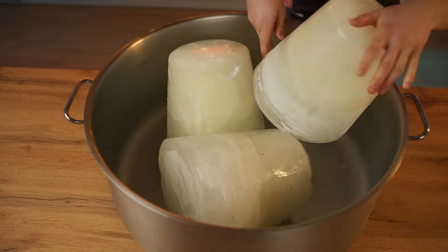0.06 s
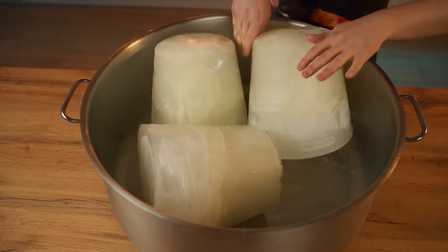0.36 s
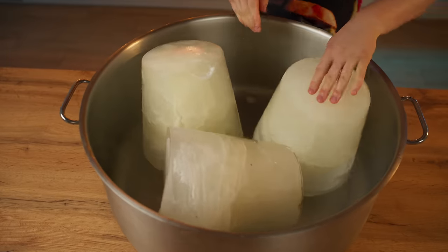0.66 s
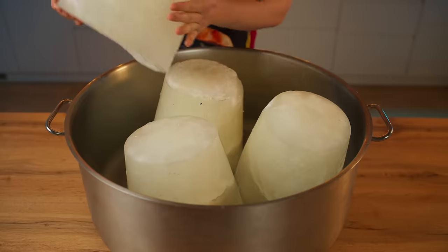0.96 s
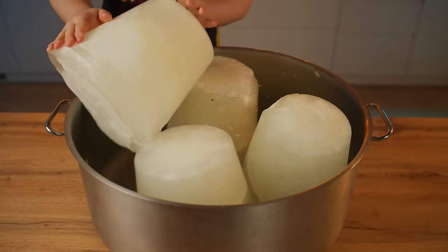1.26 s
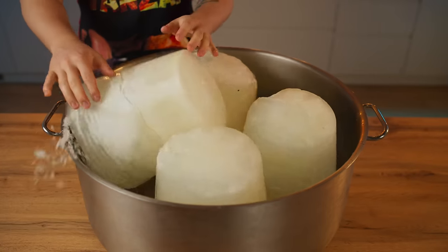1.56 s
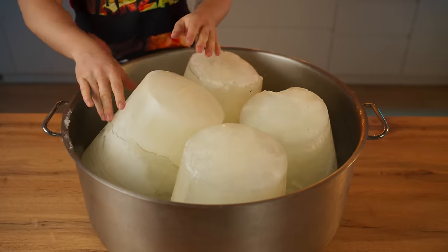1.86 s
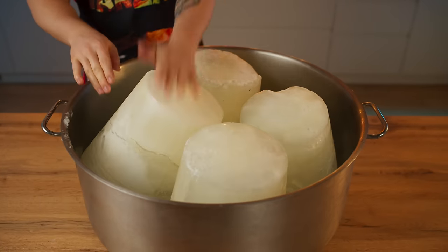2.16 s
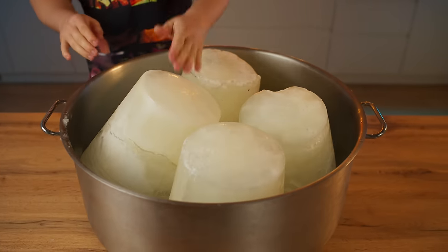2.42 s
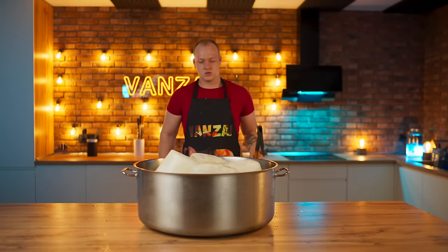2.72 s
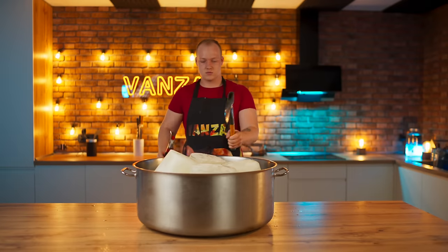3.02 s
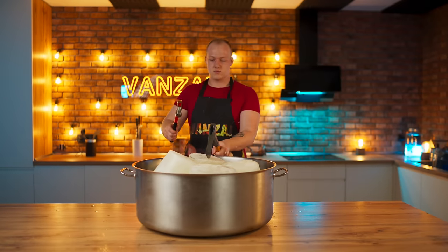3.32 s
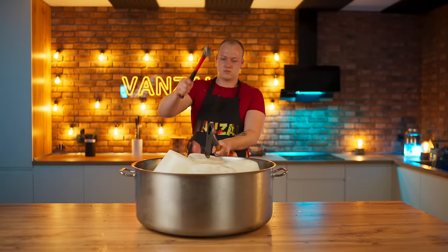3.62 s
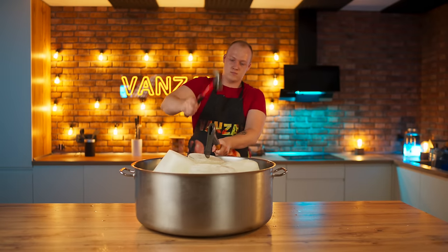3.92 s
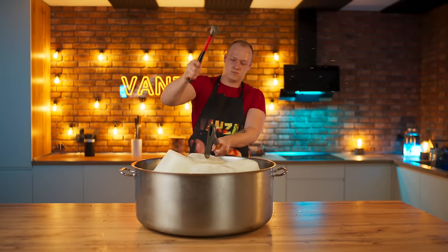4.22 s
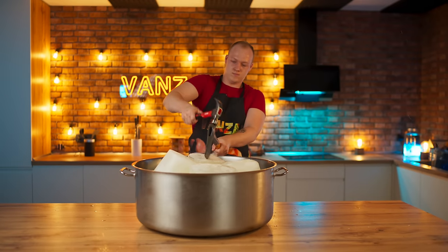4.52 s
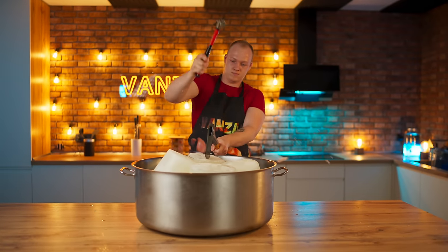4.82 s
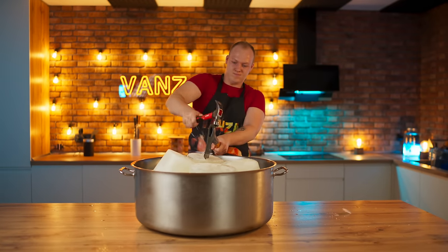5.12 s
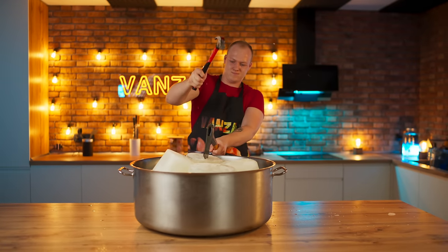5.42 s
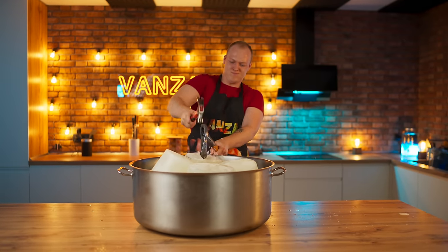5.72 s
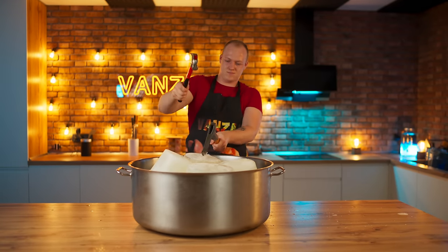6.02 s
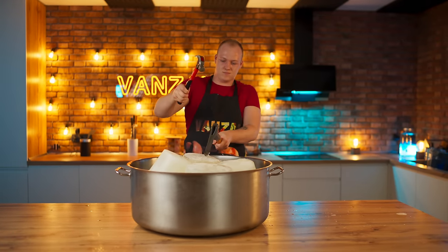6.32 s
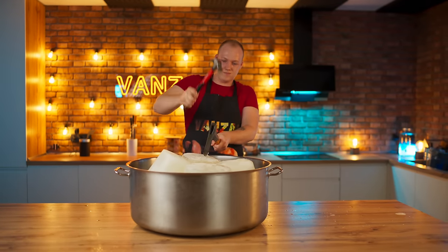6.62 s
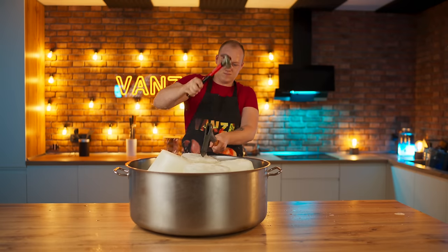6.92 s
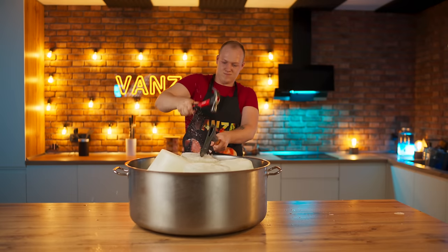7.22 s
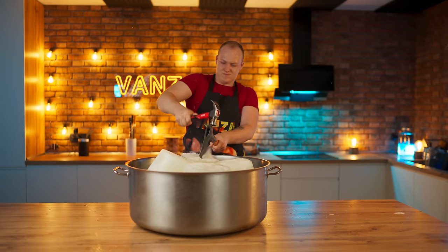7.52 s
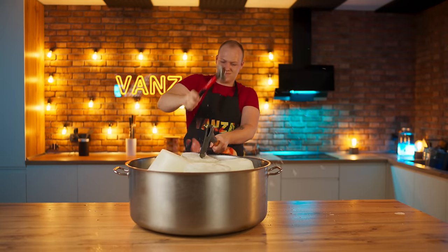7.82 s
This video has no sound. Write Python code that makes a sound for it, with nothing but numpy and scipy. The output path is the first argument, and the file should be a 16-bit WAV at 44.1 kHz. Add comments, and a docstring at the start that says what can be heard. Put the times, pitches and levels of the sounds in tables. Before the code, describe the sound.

From the start, big ice blocks land in a steel stockpot with dull thuds, hollow knocks and crackling frost, and the pot's wall and rim ring. The blocks grind down the metal at about 1.1 and 1.5 seconds and settle with a last knock at 2.1. The ringing cuts off short at 0.9 and 2.7 seconds. At 3.2 a light tap seats a steel blade in the ice. A hatchet then hammers the blade at 4.0, 4.5, 5.1 and 5.6 seconds, louder than the loading: each blow is a bright metallic clink with an ice crack and a low boom from the pot. A shard pings the pot at 4.8. After a faint rub and a soft tap near 6.2, four quicker blows fall at 6.7, 7.1, 7.5 and 7.9, increasingly splintery. Tiny chips tick between blows. The tiled kitchen adds short reverberation over a very faint rumble.

```python
"""A tiled kitchen, with a steel stockpot on the counter. Big ice blocks are set down in the pot:
they thud, grind and knock, its wall and rim ring, and frost crackles. Then a hatchet taps and hammers
a steel blade into the ice: the steel rings, the ice cracks, the pot booms and chips fly.
The room reverberates over a faint rumble. Three passages each run through a fast limiter,
and the ringing stops short at the end of each."""
import sys
import numpy as np
from scipy import signal
from scipy.fft import rfft, irfft
from scipy.io import wavfile
from scipy.ndimage import uniform_filter1d, minimum_filter1d

SR = 44100
rng = np.random.default_rng(int(sys.argv[2]) if len(sys.argv) > 2 else 0)


def to_wav(sig):
    """Store sig (one row per channel, or 1-D mono) as 16-bit WAV at the path in sys.argv[1].

    Samples outside -1..1 are clipped; the rate is SR.
    """
    pcm = np.clip(np.atleast_2d(sig), -1, 1) * 32767
    pcm = np.round(pcm).astype(np.int16)
    wavfile.write(sys.argv[1], SR, pcm.T)  # frames by channels


N = 351036
SIZE = 65536  # samples in one event
T, HZ = np.arange(SIZE) / SR, np.arange(SIZE // 2 + 1) * SR / SIZE
TICK_S = 0.0013  # the first instant of a hard contact

# hatchet blows: (time [s], thud [dB], ring [dB], hardness [dB], clank centre [Hz], crack decay [s])
BLOWS = [(3.9613, -24, -28.5, -5, 6440, .003), (4.5158, -25.5, -22, -10, 6600, 0.0064),
         (5.0674, -22.5, -17.5, -13, 6900, 0.031), (5.6008, -30, -26, -14, 7550, 0.0033),
         (6.6889, -34, -25, -12, 6690, 0.0025), (7.1116, -28, -22, -8.5, 8000, 0.019),
         (7.5098, -29, -21.5, -7.5, 7000, 0.021), (7.8706, -25.5, -22, -11, 7550, 0.0061)]
# passages: (start [s], end [s], limiter ceiling [dB])
PASSAGES = [(0, .892, -18), (.892, 2.728, -18), (2.728, 8, -7.7)]
# modes of pot wall, singing rim and counter: (frequency [Hz], level [dB], t60 [s])
WALL_MODES = [(1310, 2, .4), (1660, 1.5, 0.23), (1865, -6.5, 0.17), (1960, -0.5, 0.16), (2207, -5, .35),
              (2384, -2, .4), (2495, -3.5, 0.35), (2430, -6, 0.13), (2650, 0, 0.14), (2780, 0, 0.25),
              (2966, -9, .35), (3320, -1, .22), (3590, 0, .16), (4100, -7.5, 0.12)]
RIM_MODES = [(468, -5, 2.1), (506, 0, 2.3), (544, -12, 2.1), (996, -7, 1.9), (1044, -8, 1.7),
             (1168, -12, .7), (1610, -10, 1.1)]
COUNTER_MODES = [(41, -8.5, .3), (59, -6, 0.7)]
# tone of each kind of contact: (frequency [Hz], level [dB])
THUD_EQ = [(25, -48), (55, 4), (95, -12.5), (140, 2.5), (195, -1), (250, -0.5), (360, 2), (480, -6.5),
           (640, -2.5), (900, -28), (2500, -63)]  # the push through pot and counter
CRACK_EQ = [(200, -3.5), (700, 6.5), (1000, 5), (1350, 9), (1900, -1.5), (2600, 5), (3600, 5.5),
            (4600, 7.5), (5800, 5), (8300, -14.5), (10000, -19.5)]
GRIND_EQ = [(300, -24), (1200, 0), (2500, 2), (3100, 0.5), (3900, 1), (4800, -11), (7000, -13),
            (14000, -45.5)]
CRUNCH_EQ = [(2000, -39.5), (4000, 13), (5600, 9.5), (7500, 5), (10000, 8.5), (14000, 6), (16000, -2)]
SPLINTER_EQ = [(1500, -1.5), (4000, 1), (7000, 2.5), (10500, -0.5), (12700, 2.5), (13800, -13.5),
               (16000, -20.5)]


def block_contacts():
    """Yield (time, (thud, block, wall, crunch) dB, knock Hz, wall centre Hz, decay s, slides)."""
    # blocks hit the floor or slide down the wall: (time [s], level [dB], brightness [dB], decay [s])
    landings = [(0.002, -29.5, 0, 0.0089), (0.2975, -25.5, -2.5, 0.0038), (0.521, -35, 0, 0.019),
                (0.9715, -44.5, 2, 0.0073), (1.667, -33, 1, 0.021), (2.144, -38, 5.5, 0.0068)]
    scrapes = [(0.351, -27.5, 0, 0.013), (1.083, -31.5, 0, 0.045), (1.402, -41.5, 1.5, 0.017),
               (1.443, -25, 0, 0.04), (1.525, -32, 0.5, 0.04), (1.725, -40, 3, 0.0077)]
    # block knocks on block: (time [s], level [dB], pitch [Hz])
    bumps = [(0.0768, -31.5, 780), (0.156, -37, 376), (0.373, -27.5, 850), (0.477, -38.5, 990),
             (0.6506, -36.5, 650), (0.6977, -39, 406), (1.184, -39.5, 252), (1.2656, -31.5, 460)]
    landing_db, scrape_db, bump_db = (5.5, -.5, 0, -12), (-2.5, -7.5, -2, -15.5), (-0.5, 0, -6, -27.5)
    edge_tilt = np.array((-1, -0.4, 0.32, 1.5))  # a bright hit on an edge trades thud for crunch
    for table, mix_db, slides in ((landings, landing_db, False), (scrapes, scrape_db, True)):
        for s, db, bright_db, length in table:
            levels = db + np.array(mix_db) + bright_db * edge_tilt
            yield s, levels, 656, 2176 * 2 ** (0.66 * bright_db), length, slides
    for s, db, hz in bumps:
        yield s, db + np.array(bump_db), hz, 1500, 0.0053, False


def ice_in_pot():
    """Each contact shakes base, block, wall and rim as ice crumbles; knocks also jolt the counter."""
    # pot base, loaded with ice: (frequency [Hz], level [dB], t60 [s])
    base_modes = [(70, -5.5, 0.13), (89.8, -5, 0.55), (138, 1, 0.24), (185.7, 2, 0.078), (241.2, 0.5, 0.28),
                  (288, 6.5, 0.038), (334.6, -2, 0.29), (413, 0.5, 0.035)]
    # body of an ice block: (frequency [Hz], level [dB])
    block_eq = [(100, -16.5), (380, 8), (650, 4), (900, 4), (1400, 5), (2500, -26), (6000, -65)]
    tails = [kitchen(build_s=.008) for _ in range(5)]
    base = modes(base_modes) * focus(hz=205, q=0.3)
    wall, rim, counter = map(modes, (WALL_MODES, RIM_MODES, COUNTER_MODES))
    block, grind, crunch, crack = map(colour, (block_eq, GRIND_EQ, CRUNCH_EQ, CRACK_EQ))
    for k, (s, levels, knock_hz, wall_hz, length, slides) in enumerate(block_contacts()):
        thud_db, block_db, wall_db, crunch_db = levels
        tail = tails[k % len(tails)]
        force = crumble(length, spread_db=-0.5) if slides else hit(length, crush_db=15, spread_db=1.5)
        # the deep pot holds on to the lows; the crunch comes almost dry
        boomy, near = force + amp(-1) * tail, force + amp(-2.5) * tail
        crumbs = crumble(length, spread_db=-2) + amp(-7.5) * tail
        body = play(boomy * base, thud_db - .8) + play(near * block, block_db - .8)
        hollow = play((1 + amp(-4) * tail) * focus(knock_hz, q=11), block_db - 3)
        ring = play(near * wall * focus(wall_hz, q=2.1), wall_db - 7.5) + play(rim, block_db - 15.5)
        scrape = play(near * grind * focus(wall_hz, q=2), wall_db + 1)
        yield s, body + hollow + ring + scrape + play(crumbs * crunch, crunch_db + 4.5)
        if not slides:
            tick = hit(TICK_S, crush_db=8.5, spread_db=4)
            yield s, play(counter, wall_db - 8) + play(tick * crack, crunch_db - 2.5)


def hatchet_blows():
    """Steel rings on steel and the ice cracks; the push thuds through pot and counter."""
    # blade and hatchet head, struck hard: (frequency [Hz], level [dB], t60 [s])
    main_modes = [(3830, -5, .035), (4030, -4, .05), (4107, 0, .1), (4195, -1, .08), (4340, -6, .07)]
    upper_modes = [(5052, 0, .105), (5250, -2, .05)]
    clank_modes = [(5700, -14.5, 0.0062), (6360, 0, 0.011), (6790, 2.5, 0.0087), (7520, 2.5, 0.013),
                   (8485, -2.5, 0.012)]
    # the full pot, shaken as a whole: (frequency [Hz], level [dB], t60 [s])
    hum_modes = [(252, 5.5, 0.58), (320, -0.5, 1), (376, -1.5, 1.0)]
    main, upper, high = map(modes, (main_modes, upper_modes, clank_modes))
    hum, counter = modes(hum_modes), modes(COUNTER_MODES)
    crack, splinter, thud = colour(CRACK_EQ), colour(SPLINTER_EQ), late_thud()
    tails = [kitchen(build_s=0.0019) for _ in BLOWS]
    for tail, (s, thud_db, ring_db, hard_db, clank_hz, length) in zip(tails, BLOWS):
        # as the block breaks up, its crack rises in pitch and it splinters more
        elapsed = s - BLOWS[0][0]
        crack_hz = 2480 + 140 * elapsed
        splinter_db = -26 + 3.5 * elapsed + 0.69 * hard_db
        crack_db = -17 - 0.17 * hard_db  # on a softer hit the blade sinks in and splits more ice
        force = hit(length, crush_db=20.5, spread_db=-1.5)
        ice = play((force + amp(-4.5) * tail) * crack * focus(crack_hz, q=0.85), crack_db)
        ice += play((force + amp(-4) * tail) * splinter, splinter_db)
        # the head chatters on the blade, so no two blows ring alike
        chatter = hit(0.0059, crush_db=10.5, spread_db=3) + amp(-0.5) * tail
        steel = play(chatter * main, ring_db + 5.5)
        steel += play(chatter * upper, ring_db + min(hard_db, -8) + 8.5)
        clank = play(chatter * high * focus(clank_hz, q=3.3), ring_db + hard_db + 8.5)
        clank += play(chatter * focus(hz=5270, q=9.5), ring_db + hard_db + 6)
        push = hit(0.026, crush_db=6, spread_db=7.5) + tail
        pot = play(push * thud, thud_db + 5) + play(hum, thud_db - 9) + play(counter, db=-45.5)
        tick = play(hit(TICK_S, crush_db=16.5, spread_db=-6) * splinter, db=-19)
        yield s, tick + ice + steel + clank + pot


def seating_taps():
    """Light taps seat the blade: it rings loosely and nicks the ice over a soft thud."""
    # taps: (time [s], thud [dB], thud centre [Hz], crack [dB], ring [dB])
    taps = [(3.1769, -32.5, 106, -41, -45.5), (6.209, -39, 413, -55.5, -63)]
    # the loose blade: (frequency [Hz], level [dB], t60 [s])
    blade_modes = [(2850, -9, 0.14), (3680, -4, .04), (3830, 0, 0.07), (4100, 1, 0.05), (5340, -5, 0.05),
                   (5615, 1, 0.08), (5760, -3, .04), (9350, 1, 0.012)]
    for s, thud_db, thud_hz, crack_db, ring_db in taps:
        tail = kitchen(build_s=0.0019)
        tap = hit(0.0073, crush_db=8.5, spread_db=-2) + amp(2.5) * tail
        pot = play(tap * late_thud() * focus(thud_hz, q=0.41), thud_db)
        counter = play(modes(COUNTER_MODES), crack_db + 3.5)
        ice = play(tap * colour(CRACK_EQ) * focus(hz=1400, q=0.2), crack_db + 2)
        ice += play(tap * colour(SPLINTER_EQ), crack_db - 2.5)
        yield s, pot + counter + ice + play((1 + tail) * modes(blade_modes), ring_db + 8)


def flying_shards():
    """A shard strikes the pot and rings its wall and rim."""
    # impacts: (time [s], level [dB], ring centre [Hz])
    shards = [(4.761, -38, 2543), (4.9975, -50.5, 1440)]
    for s, db, hz in shards:
        strike = hit(.012, crush_db=9.5, spread_db=2.5) + amp(1) * kitchen(build_s=.008)
        wall = play(strike * modes(WALL_MODES) * focus(hz, q=6), db)
        rim = play(modes(RIM_MODES) * focus(hz, q=3), db - 18.5)
        grit = play(strike * colour(GRIND_EQ) * focus(hz, q=0.76), db + 3.5)
        yield s, wall + rim + grit + play(strike * colour(CRUNCH_EQ), db - 14)


def ice_clicks(tail):
    """Small ice chips land with bright clicks: two about half a second after each blow, and a few louder ones
    at set times."""
    # louder clicks at set times: (time [s], level [dB])
    snaps = [(2.364, -60.5), (5.0244, -56.5), (5.58, -48)]
    chips = [(s + rng.normal(0.5, 0.099), rng.normal(-64, 2.5)) for s, *_ in BLOWS for _ in range(2)]
    tone = colour(CRUNCH_EQ) * focus(hz=10000, q=.7)
    for s, db in [*snaps, *chips]:
        click = hit(0.0041, crush_db=18, spread_db=6) + amp(-4) * tail
        yield s, play(click * tone, db - 0.5)


def rubbing(tail):
    """Hand and blade rub a swell of tiny grains off the ice."""
    # strokes: (time [s], length [s], level [dB])
    strokes = [(2.61, 0.084, -70.5), (3.515, 0.15, -68), (5.879, 0.18, -51.5), (6.986, 0.087, -57.5),
               (7.774, 0.12, -45)]
    # their rasp: (frequency [Hz], level [dB])
    rub_eq = [(300, -4.5), (1300, -15.5), (2600, -5), (4000, -5), (6000, -15.5), (10000, -11), (16000, -18)]
    for s, length, db in strokes:
        swell = np.sin(np.pi * np.minimum(T / length, 1)) ** .5
        yield s, play((1 + tail) * rfft(grains(spread_db=5) * swell) * colour(rub_eq), db)


def frost(tail, snaps_per_s=200, fade_db_per_s=120):
    """Brittle snaps, each a millisecond of fractures, flare at every block contact and die away."""
    click = irfft(colour(CRUNCH_EQ) * (1 + amp(-8) * tail))
    onsets = rng.random(N) < snaps_per_s / SR
    sizes = amp(5.5 * np.minimum(rng.exponential(size=N), 3.5))
    snaps = signal.lfilter([1], [1, -np.exp(-1000 / SR)], onsets * sizes) * rng.standard_normal(N)
    level = np.zeros(N)
    for s, (_, _, wall_db, _), *_ in block_contacts():
        add(level, s, amp(wall_db - 18.5 - fade_db_per_s * T))
    crackle = signal.fftconvolve(snaps / snaps.std() * level, click / np.linalg.norm(click))[:N]
    for start, _, _ in PASSAGES:  # the crackle carries on through every passage
        yield start, crackle[int(start * SR):]


def kitchen(build_s):
    """Spectrum of a diffuse tail of unit energy; it builds up, and its treble dies first."""
    # reverb of the tiled room: (frequency [Hz], t60 [s])
    decays = [(60, 0.62), (160, 0.71), (400, 0.58), (1100, 0.56), (3000, 0.48), (7500, 0.43), (15000, 0.32)]
    noise, tail = rfft(rng.standard_normal(SIZE)), 0
    for hz, t60 in decays:
        band = along([(f, f == hz) for f, _ in decays], HZ)
        tail = tail + irfft(noise * band) * amp(-60 * T / t60)
    return unit_spectrum(tail * (1 - np.exp(-T / build_s)))


def room_tone():
    """The faint steady rumble of the room."""
    # noise spectrum: (frequency [Hz], level [dB])
    rumble_eq = [(15, -18.5), (25, -6), (229, -16), (263, -19), (394, -23), (591, -26.5), (695, -23),
                 (1370, -33.5), (3720, -33), (16000, -45.5)]
    gain = amp(along(rumble_eq, np.arange(N // 2 + 1) * SR / N))
    rumble = irfft(rfft(rng.standard_normal(N)) * gain, N)
    return rumble * amp(-74.5) / rumble.std()


def hit(decay_s, crush_db, spread_db):
    """Force spectrum of a hit: one push, then grains of crushing at crush_db above it."""
    force = grains(spread_db) * np.exp(-T / decay_s)
    force *= amp(crush_db) / np.linalg.norm(force)
    force[0] += 1
    return unit_spectrum(force)


def crumble(length_s, spread_db):
    """Force spectrum of frost giving way: it builds up under the block and fades."""
    age = T / length_s
    return unit_spectrum(grains(spread_db) * np.sqrt(age) * np.exp(-1.5 * age))


def grains(spread_db):
    """Dense micro-fractures: many small, a few large."""
    x = rng.standard_normal(SIZE) * (rng.random(SIZE) < .1)
    x *= amp(spread_db * np.minimum(rng.exponential(size=SIZE), 4))
    return x / x.std()


def late_thud(delay_s=0.00394):
    """Response of pot and counter, which the push reaches a moment after the strike."""
    return colour(THUD_EQ) * np.exp(-2j * np.pi * HZ * delay_s)


def modes(table):
    """Frequency response of damped modes of alternating sign."""
    return rfft(sum((-1) ** k * amp(db - np.minimum(60 * T / t60, 200)) * np.sin(2 * np.pi * hz * T)
                    for k, (hz, db, t60) in enumerate(table)))


def colour(eq):
    """Minimum-phase response of an EQ curve."""
    cepstrum = irfft(np.log(amp(along(eq, HZ))))
    cepstrum[1:SIZE // 2] *= 2
    cepstrum[SIZE // 2 + 1:] = 0
    return np.exp(rfft(cepstrum))


def focus(hz, q):
    """Band-pass response: the part of the spectrum that a contact drives most."""
    return 1j * HZ * hz / q / (hz ** 2 - HZ ** 2 + 1j * HZ * hz / q)


def play(spectrum, db):
    """The sound of a spectrum, with its loudest moment at db rms."""
    x = irfft(spectrum)
    power = uniform_filter1d(x[:SIZE // 4] ** 2, 1024, mode="constant")
    return x * amp(db) / np.sqrt(power.max())


def unit_spectrum(x):
    """Spectrum of a sound scaled to unit energy."""
    return rfft(x / np.linalg.norm(x))


def amp(db):
    """Decibels to gain."""
    return 10 ** (np.asarray(db) / 20)


def along(points, hz):
    """Read (Hz, value) points on a log-frequency axis."""
    f, value = np.transpose(points)
    return np.interp(np.log(hz + 1), np.log(f), value)


def add(track, s, sound):
    """Mix a sound in at time s."""
    start = max(int(s * SR), 0)
    track[start:start + len(sound)] += sound[:max(N - start, 0)]


def limiter(x, ceiling_db, window=33):
    """Look-ahead gain that holds the peaks under the ceiling."""
    gain = np.minimum(1, amp(ceiling_db) / (np.abs(x) + 1e-9))
    return x * uniform_filter1d(minimum_filter1d(gain, window), window)


def scene():
    """Over the room tone, each passage limits its own events and gates their ring at its end."""
    events = [*ice_in_pot(), *flying_shards(), *hatchet_blows(), *seating_taps()]
    tail = kitchen(build_s=0.012)
    events += [*ice_clicks(tail), *rubbing(tail), *frost(tail)]
    mix = room_tone()
    for start, end, ceiling_db in PASSAGES:
        track = np.zeros(N)
        for s, sound in events:
            if start <= s < end:
                add(track, s, sound)
        gate = np.clip((end - np.arange(N) / SR) / 0.0051, 0, 1)
        mix += limiter(track, ceiling_db) * gate
    return mix[None]


def record(dry):
    """A steep low-pass takes off the very top."""
    return signal.sosfilt(signal.ellip(8, .2, 70, 16200, fs=SR, output="sos"), dry)


dry = scene()
out = record(dry)
to_wav(out)
```